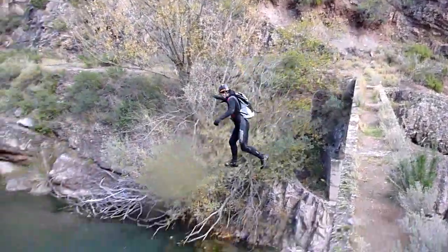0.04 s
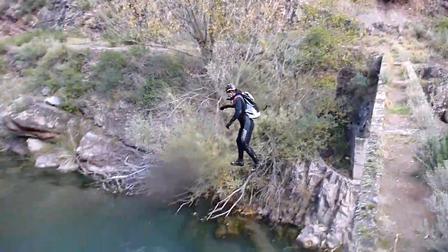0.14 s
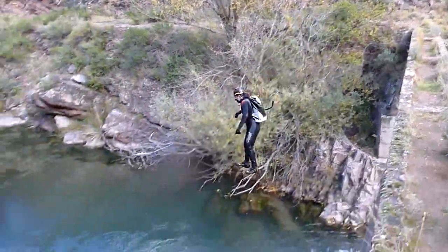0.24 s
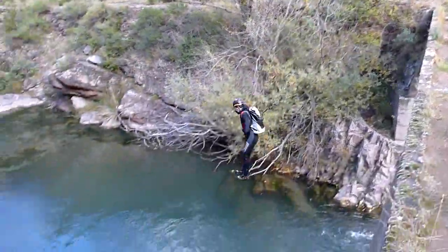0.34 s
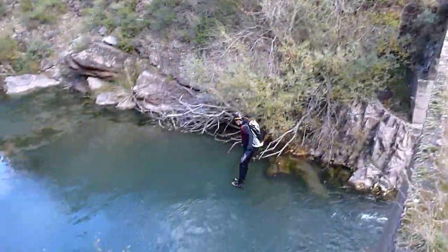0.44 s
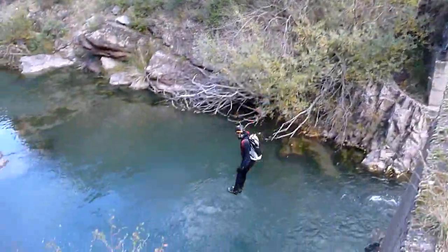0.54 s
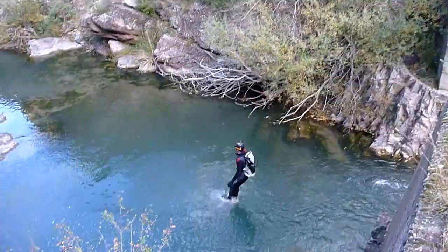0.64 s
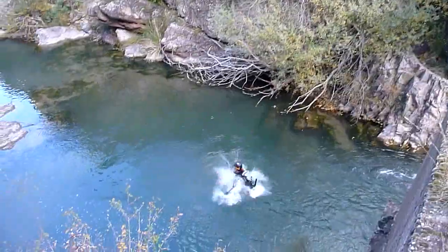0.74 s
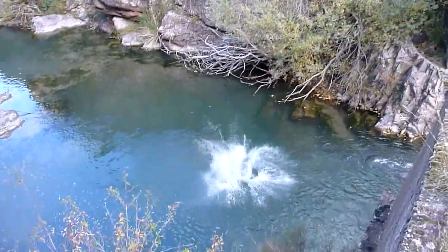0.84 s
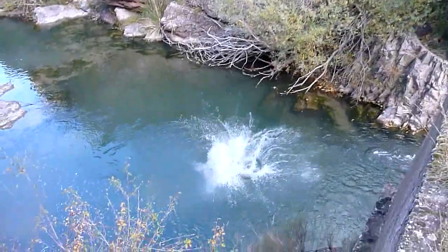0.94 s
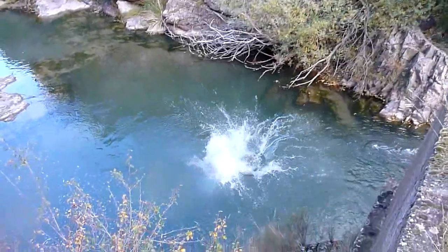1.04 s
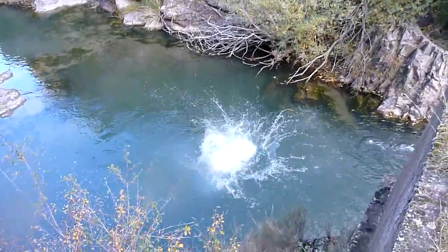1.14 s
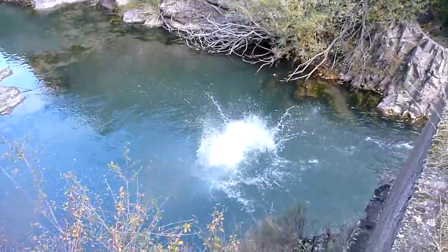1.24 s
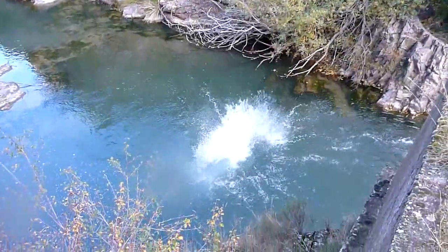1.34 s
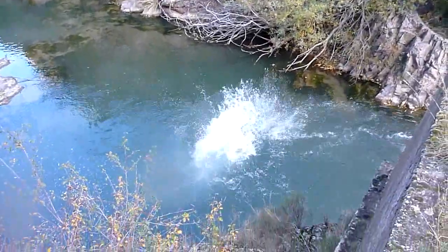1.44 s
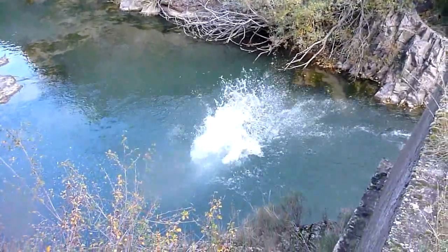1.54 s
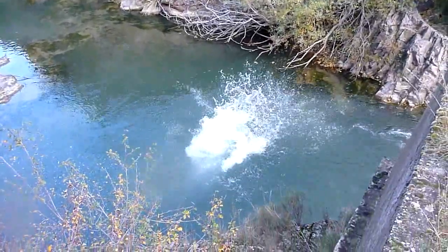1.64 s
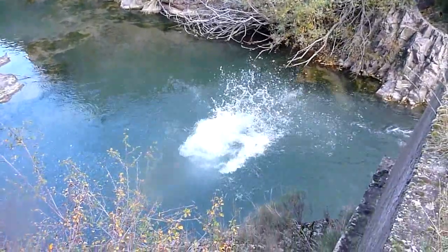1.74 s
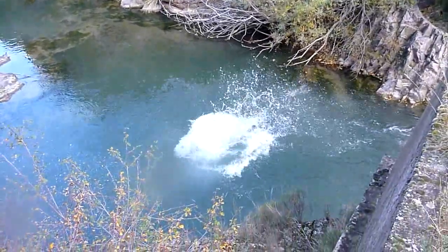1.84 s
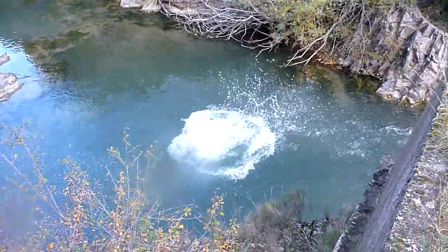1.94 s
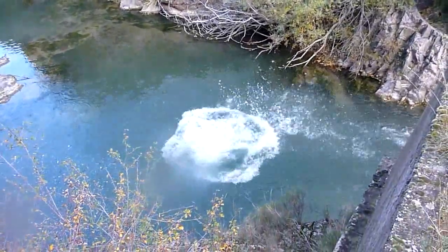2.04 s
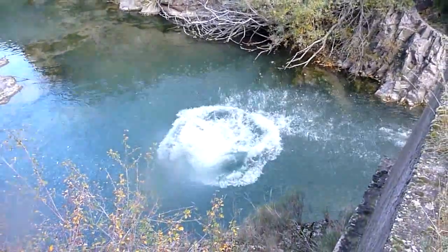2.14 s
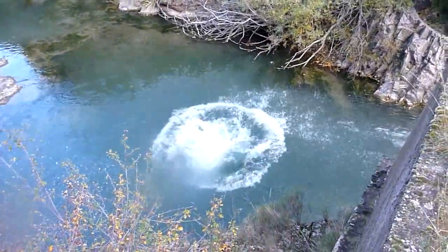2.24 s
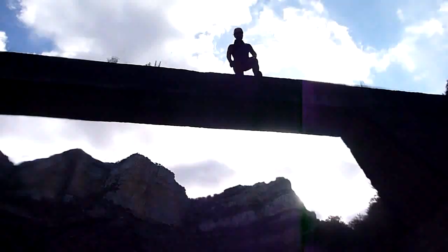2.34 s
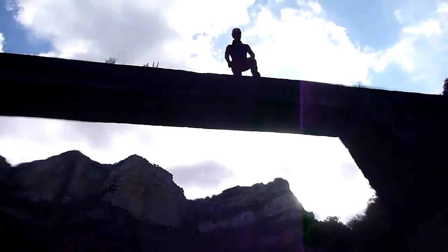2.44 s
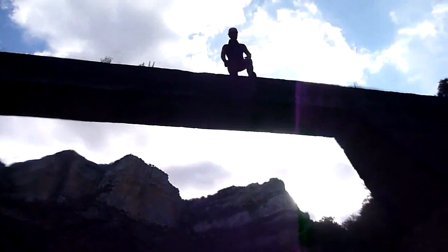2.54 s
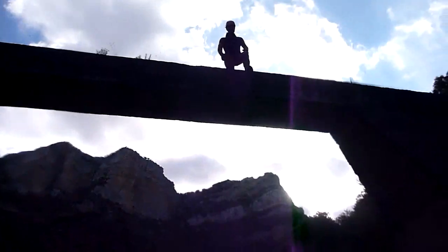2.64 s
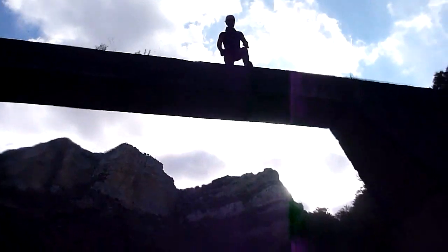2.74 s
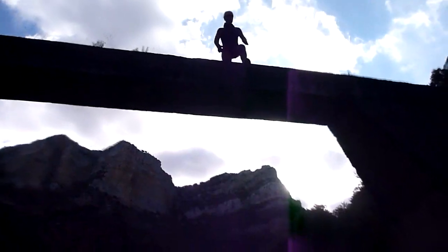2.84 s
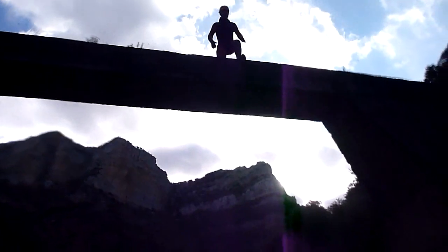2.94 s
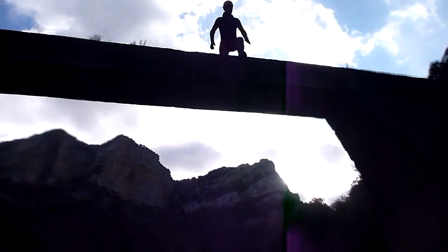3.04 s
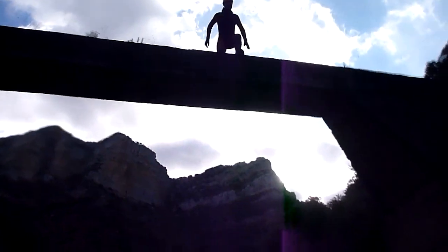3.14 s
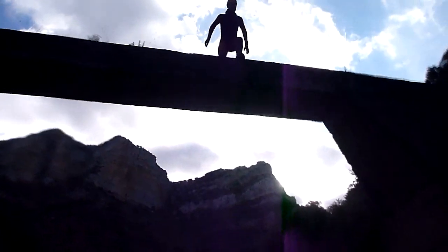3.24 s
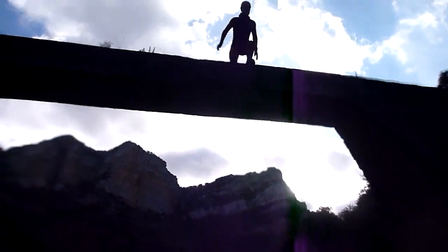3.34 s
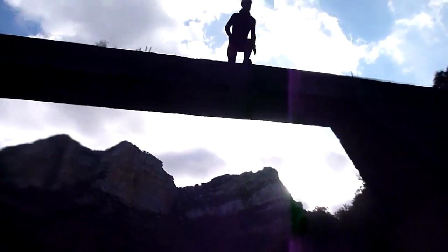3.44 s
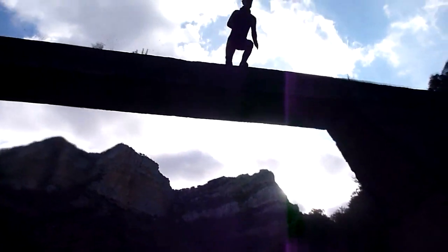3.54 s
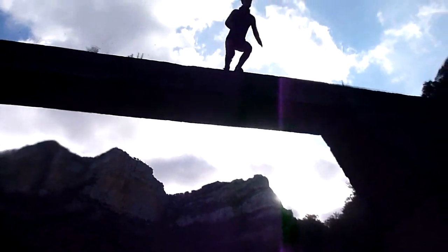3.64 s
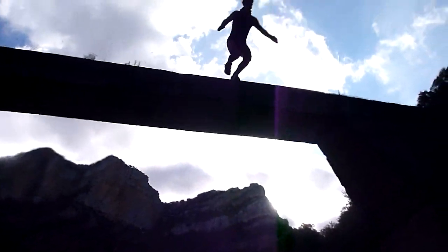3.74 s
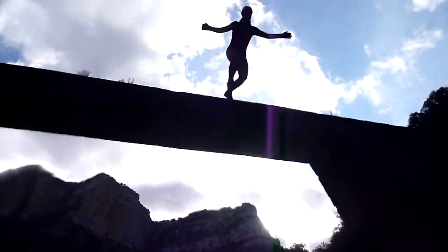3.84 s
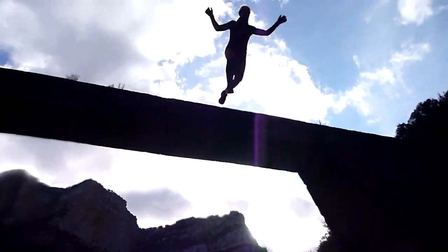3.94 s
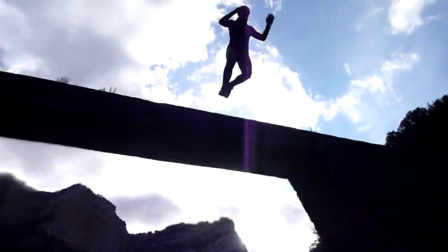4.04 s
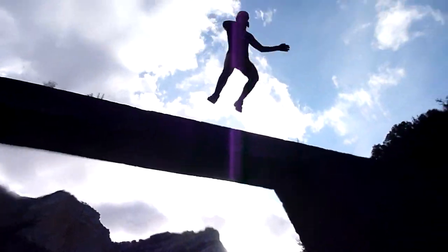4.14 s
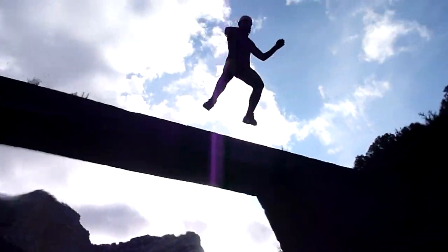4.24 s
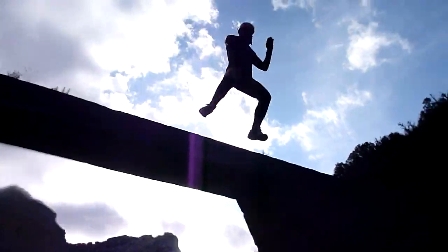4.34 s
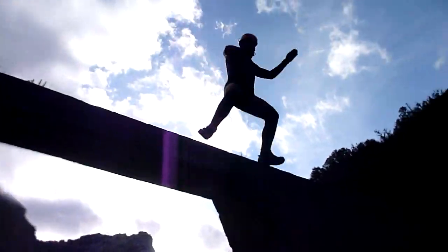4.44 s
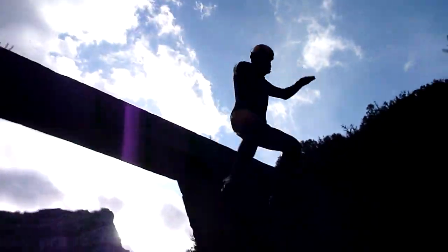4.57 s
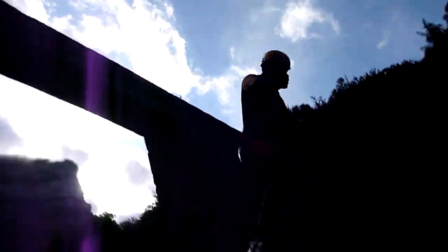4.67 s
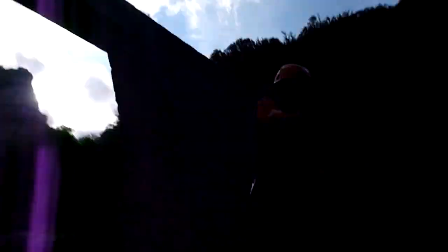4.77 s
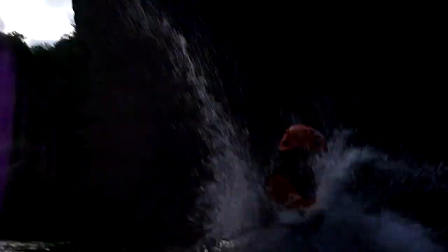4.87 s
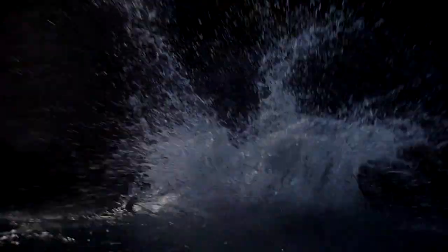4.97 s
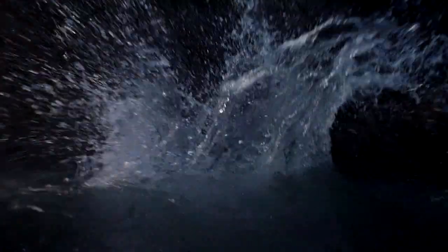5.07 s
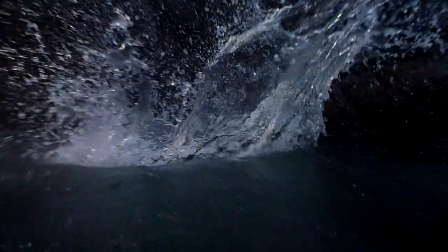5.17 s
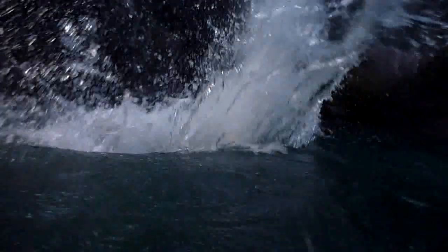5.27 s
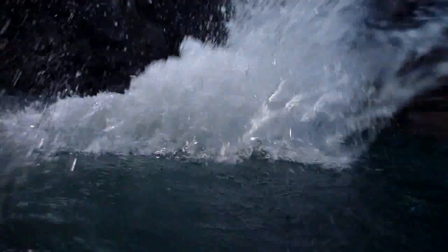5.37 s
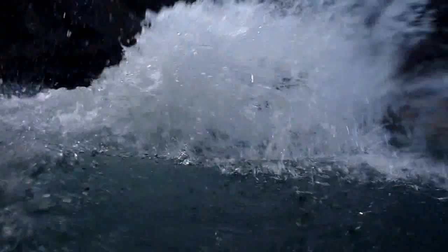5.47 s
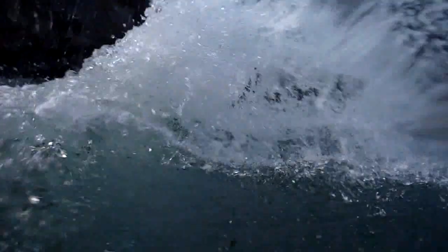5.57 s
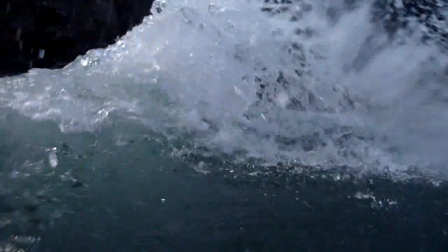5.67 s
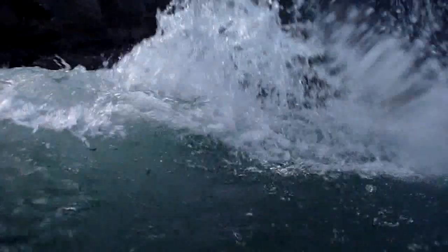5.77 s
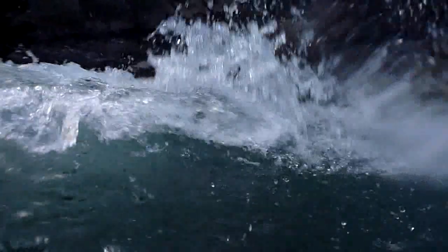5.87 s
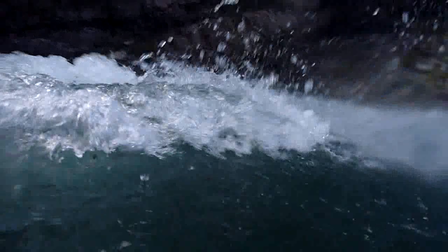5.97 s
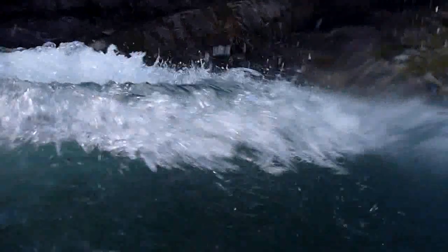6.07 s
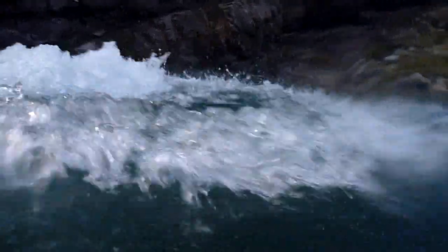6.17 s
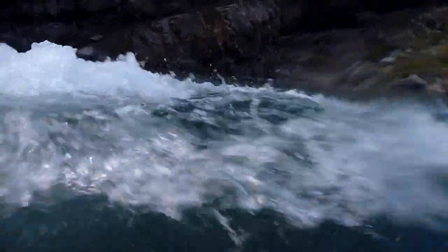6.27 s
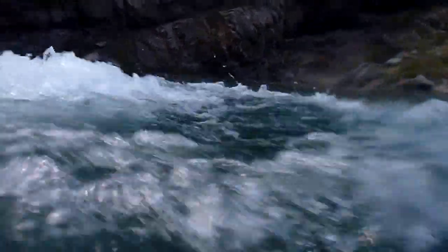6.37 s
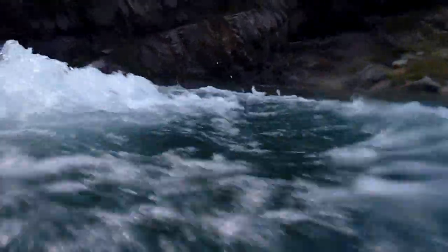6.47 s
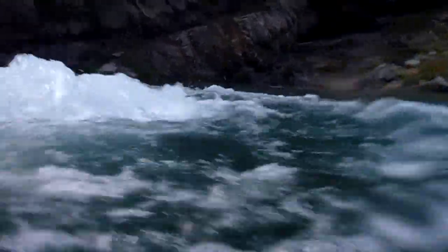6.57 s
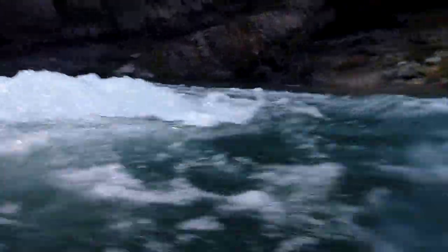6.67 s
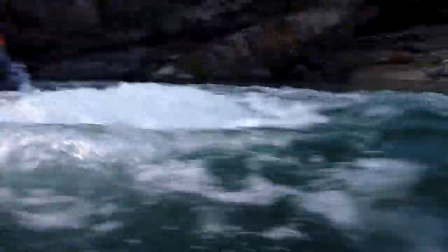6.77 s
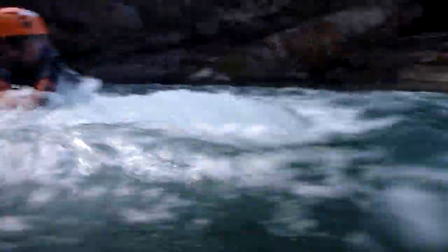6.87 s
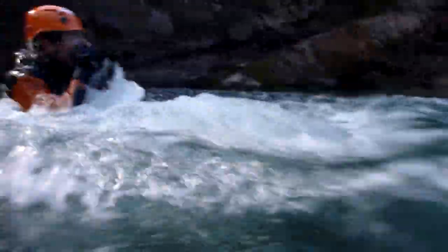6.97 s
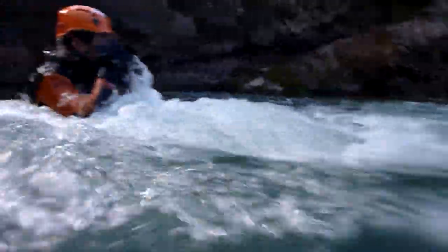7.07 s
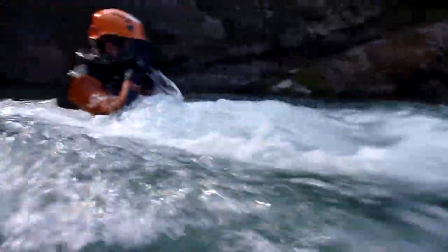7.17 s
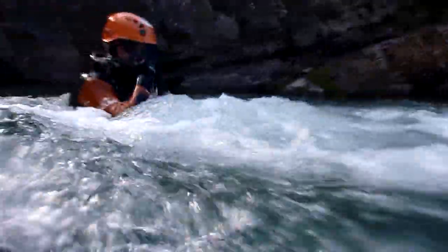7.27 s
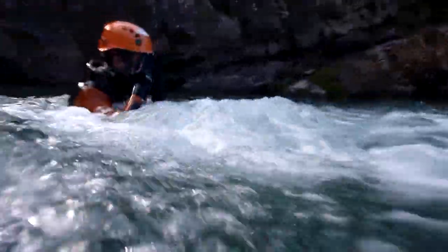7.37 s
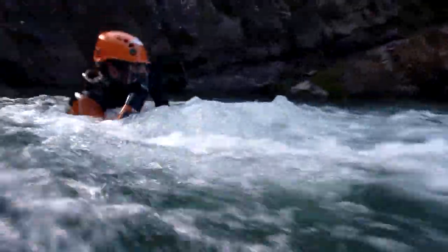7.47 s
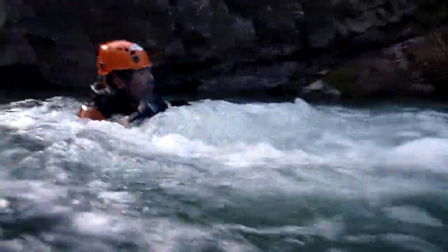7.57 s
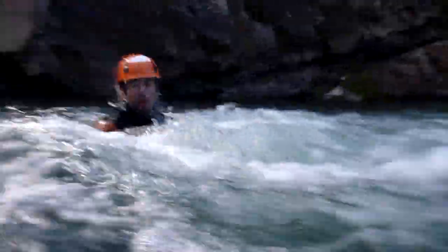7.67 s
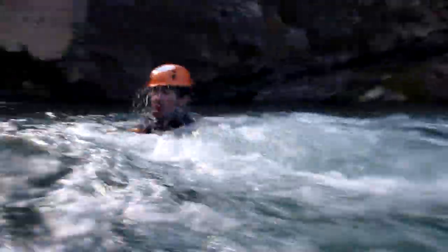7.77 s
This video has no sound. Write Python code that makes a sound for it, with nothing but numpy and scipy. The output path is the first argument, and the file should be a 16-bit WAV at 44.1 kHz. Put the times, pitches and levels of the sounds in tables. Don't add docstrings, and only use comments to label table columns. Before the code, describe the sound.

Outdoors in a river gorge, quiet muffled water is broken by a distant flat smack and a pattering splash. A momentary gap, then a cut to water level: fuller, livelier rushing water and a few hard knocks on the casing. A violent near plunge clips the small microphone, its air pocket throbs shut, the foam surges and boils, then fades into swirling water, plinks and ticks.

```python
import sys
import numpy as np
from scipy import signal
from scipy.fft import rfft, irfft
from scipy.io import wavfile
from scipy.ndimage import uniform_filter1d

SR = 44100
rng = np.random.default_rng(int(sys.argv[2]) if len(sys.argv) > 2 else 0)


def volts_from_db(level):
    exponent = np.asarray(level, float) / 20
    return 10 ** exponent


def log_audio(samples):
    frames = np.atleast_2d(samples).T
    limited = np.clip(frames, -1, 1)
    pcm = np.round(limited * 32767).astype(np.int16)
    wavfile.write(sys.argv[1], SR, pcm)


N = 344458

SPLASH_S, VIEW_CHANGE_S, PLUNGE_S = 0.77, 2.3935, 4.862
DROPOUT_START_S, DROPOUT_END_S = 2.2043, 2.2960
BELOW_DB_PER_OCTAVE, ABOVE_DB_PER_OCTAVE = 4.5, 5.5

# low_hz, high_hz
LAYER_BANDS = [(30, 250), (250, 1500), (1500, 3600), (3600, 9500)]
# rumble_db, body_db, rush_db, spray_db
RIVER_LEVELS = [
    (-46, -36.5, -40, -48),
    (-44, -30, -32.5, -41),
]
# frequency_hz, level_db
FAR_RIVER_COLOUR = [(40, -15), (90, 19.5), (300, 19), (700, 4), (1900, -18), (2500, -20), (3300, -19.5),
                    (4100, -23), (4900, -30.5), (5700, -25.5), (6800, -34), (7400, -31.5), (8500, -41)]
# frequency_hz, level_db
FALLING_SPRAY_COLOUR = [(90, -2.5), (350, -0.5), (560, -9), (1500, -6), (1850, -7), (2300, -2), (3400, -5),
                        (4050, -14), (4800, -12), (5400, -16.5), (6700, -22.5), (7450, -15), (8500, -23),
                        (9300, -29.5)]
# frequency_hz, level_db
POOL_COLOUR = [(40, -33), (150, -2), (350, 8), (600, 9), (1000, -1), (1500, -1), (1900, -6), (2600, -8),
               (3100, -15), (3700, -8), (4300, -12.5), (5500, -12.5), (6900, -6), (8500, -15.5)]
# frequency_hz, level_db
FOAM_COLOUR = [(40, -11), (150, -1.5), (350, -2.5), (700, -11), (1050, -3.5), (1600, -2), (2200, 5),
               (2700, 1.5), (3300, -4.5), (4300, -18.5), (5000, -14), (6050, -24), (6900, -13.5),
               (8500, -25.5)]
# time_s, share_of_direct, delay_ms
WATER_ECHO = [(2.39, 0, .53), (2.4, .3, .53), (3.0, .35, .52), (3.8, .35, .5), (4.4, .35, .475),
              (4.85, .35, .48), (4.87, 0, .48)]
# time_s, restlessness (factor on the flicker in dB)
RESTLESSNESS = [(.75, .3), (.8, 1.1), (2.5, .8), (2.6, .4), (4.7, .4), (4.9, 1.2), (5.4, .8), (6.3, .9),
                (7.0, 1.2)]
# time_s, strength_db
RAIN_STRENGTH = [(.77, -42), (.83, -26.5), (.9, -29), (1.07, -36.5), (1.18, -30), (1.35, -30), (1.8, -29.5),
                 (2.15, -25.5), (2.39, -29.5)]
# time_s, strength_db
BOIL_STRENGTH = [(5.2, -35.5), (5.36, -24.5), (5.55, -22.5), (5.97, -23), (6.33, -26.5), (6.63, -32),
                 (6.75, -32), (7.5, -34), (7.81, -45.5)]
# level_db at strength -30 dB, slope_db_per_db
RAIN_LAYER_LAW = [
    (-53.5, 0.5),
    (-34.5, 0.8),
    (-29.5, 1.1),
    (-38, 1.35),
]
# level_db at strength -30 dB, slope_db_per_db
BOIL_LAYER_LAW = [
    (-69, .6),
    (-31.5, 0.96),
    (-30.5, 1.14),
    (-39, 1.72),
]
# peak_s, level_db, centre_hz, rise_s, fall_s (both per 20 dB)
WATER_SURGES = [(.83, -23.5, 350, .09, .5), (1.07, -24, 250, 0.32, 0.37), (1.18, -27, 700, 0.066, -0.4),
                (2.46, -30, 800, .2, 0.4), (4.81, -38, 5000, .15, 0.6), (4.925, -33, 4500, 0.12, 0.3),
                (4.93, -19.5, 394, .09, 0.13), (4.97, -33.5, 60, .1, -1.5),
                (4.965, -19.5, 3500, 0.02, -0.77), (5.11, -17.5, 298, 0.11, 0.06),
                (5.04, -26.5, 400, 0.09, 1), (5.27, -16.5, 398, 0.15, 0.22), (5.4, -37, 90, 0.36, -1.1),
                (5.9, -39, 110, .7, -5.5), (6.05, -23.5, 700, 0.57, 1.1), (6.3, -37.5, 130, 0.81, 0),
                (6.55, -25, 300, .2, -2), (6.9, -28, 350, 0.13, -1.2), (7.07, -34.5, 3000, 0.17, 0.3),
                (7.2, -42.5, 110, 0.29, -3)]
# start_s, depth_db, recovery_s
RIVER_DUCKS = [
    (2.548, 3, 0.65),
    (4.468, 5, 0.23),
    (4.868, 6.5, 0.019),
    (5.1, 14, 0.42),
]
# start_s, crack_db, push_db, hold_s, t60_s
BODY_SLAPS = [
    (0.7689, -6, -7.5, 0.0014, 0.027),
    (4.862, -1, 3, 0.0029, 0.0063),
]
# crack_hz, crack_width_hz, push_hz, sag_per_s, push_t60_s
SLAP_TONES = [
    (1500, 1770, 360, 50, 0.025),
    (3280, 6200, 830, 115, 0.01),
]
# start_s, peak_db, pitch_hz, width_share of pitch, t60_s
HOUSING_DROPS = [(.843, -15, 295, 0.83, .03), (0.8739, -4.5, 1500, 1, 0.014), (1.364, -14, 2360, .41, .012),
                 (2.5408, 4, 4090, 0.7, 0.014), (4.463, 3, 1610, 0.32, 0.0057),
                 (4.963, -16, 6800, .22, .017), (5.073, -14.5, 5100, 0.18, .009),
                 (5.233, -2, 4600, 0.4, 0.0046), (5.233, -8, 2310, .4, .004),
                 (5.289, -12.5, 5000, .4, .005), (5.328, -10, 5800, 0.23, 0.0057),
                 (5.3324, -0.5, 2250, 0.15, 0.0063), (5.365, -14, 5560, .34, .005),
                 (5.39, -8.5, 4900, .4, .005), (6.4015, -1, 3800, 0.91, .003), (6.573, 1, 1500, 1.5, .004),
                 (6.79, -23, 4870, .2, .008), (6.845, -21, 5660, .2, .01), (6.9242, -5, 4000, 0.22, 0.012),
                 (7.3017, -16, 7300, .5, .008), (7.398, -18, 5040, .23, .008),
                 (7.592, -9, 3380, 0.65, 0.0055), (7.6235, -18, 3200, 0.18, .012),
                 (7.646, -25, 3500, 0.25, .012)]
# start_s, peak_db, pitch_hz, t60_s
LARGE_BUBBLES = [(1.179, -16.5, 2130, 0.03), (2.441, -26, 800, 0.03), (2.473, -13.5, 835, 0.027),
                 (6.133, -20, 2080, 0.03), (6.33, -12.5, 1280, 0.026), (6.688, -9.5, 2260, 0.012),
                 (6.94, -11, 2600, 0.019), (7.074, -19, 2080, 0.036), (7.092, -27, 1200, 0.023),
                 (7.255, -17, 2160, 0.024), (7.398, -14, 1030, 0.03), (7.455, -16, 2070, 0.023),
                 (7.549, -13, 1113, 0.035), (7.614, -16, 1890, 0.041), (7.657, -1, 990, 0.0051)]
# middle_s, level_db, centre_hz, width_hz, length_s
GUSTS = [
    (4.805, -34, 5700, 1600, .1),
    (4.92, -34, 5000, 1200, .05),
    (5.58, -32, 3970, 800, .08),
    (5.14, -24.5, 230, 300, .13),
    (5.2, -24, 210, 250, .07),
    (6.92, -36.5, 55, 50, .25),
    (6.58, -36.5, 60, 60, .08),
    (4.47, -43, 40, 40, .1),
]
# time_s, level_db, pulse_hz
CAVITY_PULSING = [(5.07, -44, 93), (5.095, -16, 91.7), (5.125, -17, 90.8), (5.155, -13.5, 95.4),
                  (5.172, -42.5, 92.7), (5.19, -12.5, 87), (5.211, -14.5, 84), (5.24, -26, 99.4),
                  (5.31, -27, 100)]
# centre_hz, width_hz
PORT_NOTCHES = [(2893, 200), (7880, 300), (8080, 520)]
# frequency_hz, level_db
FREQUENCY_RANGE = [(20, -21.5), (50, -7), (90, -1.5), (8600, -1.5), (9300, -11.5), (9700, -24.5),
                   (10000, -37), (10500, -88.5)]


def evened(x):
    return x / np.sqrt(np.mean(x ** 2) + 1e-20)


def read(points, hz):
    f, value = np.transpose(points)
    return np.interp(np.log(hz + 1), np.log(f + 1), value)


def add(mix, start_s, sound):
    part = mix[round(start_s * SR):][:len(sound)]
    part += sound[:len(part)]


def ring(x, hz, width_hz):
    ratio = 1 + width_hz / (2 * hz)
    band = [hz / ratio, min(hz * ratio, SR / 2.2)]
    return signal.lfilter(*signal.butter(1, band, "band", fs=SR), x)


def bubbles(per_s, lo_hz, hi_hz, cycles, spread_db, sizes=24):
    out = np.zeros(N)
    for hz in np.geomspace(lo_hz, hi_hz, sizes):
        turns = np.arange(0, 3 * cycles, hz / SR)
        envelope = np.exp(-2 * turns / cycles) * np.minimum(turns, 1)
        chirp = np.sin(2 * np.pi * turns * (1 + 0.0239 * turns)) * envelope
        count = int(np.clip(per_s * N / SR / sizes, 1, 400))
        place, rarity = rng.random((400, 2))[:count].T
        train = np.zeros(N)
        train[(place * N).astype(int)] = volts_from_db(-spread_db * np.log(rarity + 0.013))
        out += signal.oaconvolve(train, chirp / np.linalg.norm(chirp))[:N]
    return evened(out)


def layers_db(t, centres_hz):
    near = t > VIEW_CHANGE_S
    duck_db = 0
    for s, depth_db, recovery_s in RIVER_DUCKS:
        duck_db = duck_db + depth_db * (t > s) * np.exp(-np.maximum(t - s, 0) / max(recovery_s, 0.005))
    power = volts_from_db(np.transpose(RIVER_LEVELS)[:, near.astype(int)] - duck_db) ** 2

    for curve, law in ((RAIN_STRENGTH, RAIN_LAYER_LAW), (BOIL_STRENGTH, BOIL_LAYER_LAW)):
        s, strength_db = np.transpose(curve)
        base_db, slope = np.transpose(law)[:, :, None]
        sounding = (t > s[0]) & (near == (s[0] > VIEW_CHANGE_S))
        power = power + sounding * volts_from_db(base_db + slope * (np.interp(t, s, strength_db) + 30)) ** 2

    for s, db, hz, rise_s, fall_s in WATER_SURGES:
        octaves = np.log2(centres_hz / hz)[:, None]
        tilt_db = np.minimum(BELOW_DB_PER_OCTAVE * octaves, -ABOVE_DB_PER_OCTAVE * octaves)
        shape_db = 20 * np.minimum((t - s) / max(rise_s, 0.01), (s - t) / max(fall_s, 0.01))
        same_view = near == (s > VIEW_CHANGE_S)
        power = power + same_view * volts_from_db(db + tilt_db + shape_db) ** 2
    return 10 * np.log10(power)


def water():
    bubble_share = 0.15
    hiss = np.sqrt(1 - bubble_share) * rng.standard_normal(N)
    drive = hiss + np.sqrt(bubble_share) * bubbles(1200, 688, 8890, cycles=9.9, spread_db=0.64)
    hz, t, spectra = signal.stft(drive, SR, nperseg=512, noverlap=384)

    stage = (t > SPLASH_S).astype(int) + (t > VIEW_CHANGE_S) + (t > PLUNGE_S)
    stage_colours = (FAR_RIVER_COLOUR, FALLING_SPRAY_COLOUR, POOL_COLOUR, FOAM_COLOUR)
    colour = volts_from_db([read(points, hz) for points in stage_colours])[stage].T

    s, share, delay_ms = np.transpose(WATER_ECHO)
    delay_s = np.interp(t, s, delay_ms) / 1000
    echo = np.interp(t, s, share) * (hz[:, None] < 7000) * np.exp(-2j * np.pi * hz[:, None] * delay_s)
    colour = colour * abs(1 - echo)

    centres = np.log([np.sqrt(lo * hi) for lo, hi in LAYER_BANDS])
    wanted_db = layers_db(t, np.exp(centres))
    blend = np.array([np.interp(np.log(hz + 1), centres, row) for row in np.eye(len(LAYER_BANDS))])
    inside = np.array([(hz > lo) & (hz <= hi) for lo, hi in LAYER_BANDS]) / len(hz)
    for _ in LAYER_BANDS:
        level_db = 10 * np.log10(inside @ colour ** 2)
        colour = colour * volts_from_db(blend.T @ (wanted_db - level_db))

    patches = uniform_filter1d(rng.standard_normal(spectra.shape), 8, 0)
    patches = evened(uniform_filter1d(patches, 12, 1))
    gusts = evened(uniform_filter1d(rng.standard_normal(len(t)), 3))
    restless = np.interp(t, *np.transpose(RESTLESSNESS))
    colour = colour * volts_from_db(restless * (0.8 * patches + 0.9 * gusts))
    return signal.istft(spectra * colour, SR, nperseg=512, noverlap=384)[1][:N]


def slaps():
    out, t = np.zeros(N), np.arange(3000) / SR
    for slap, tone in zip(BODY_SLAPS, SLAP_TONES):
        s, crack_db, push_db, hold_s, crack_t60 = slap
        crack_hz, width_hz, push_hz, sag, push_t60 = tone
        crack = ring(rng.standard_normal(len(t)), crack_hz, width_hz)
        crack = evened(ring(crack, crack_hz, 2 * width_hz))
        sagging = -np.sin(2 * np.pi * push_hz * t / (1 + sag * t))
        heave = 0.34 * np.minimum(t / hold_s, 1)
        hollow = 1.35 * np.sin(2 * np.pi * 930 * t) * volts_from_db(-4000 * t)
        push = sagging + heave + hollow
        onset = np.minimum(t / 0.0003, 1)
        after_hold_s = np.maximum(t - hold_s, 0)
        crack_fade = onset * volts_from_db(-60 * after_hold_s / crack_t60)
        push_fade = onset * volts_from_db(-60 * after_hold_s / push_t60)
        add(out, s, crack_fade * volts_from_db(crack_db) * crack + push_fade * volts_from_db(push_db) * push)
    return out


def drops():
    out, t = np.zeros(N), np.arange(1500) / SR
    rattles = rng.standard_normal((len(HOUSING_DROPS), len(t)))
    for (s, db, hz, width_share, t60), rattle in zip(HOUSING_DROPS, rattles):
        blow = 6 * (t == 0) + rattle * volts_from_db(-60 * t / max(t60, 0.001))
        own = evened(ring(ring(blow, hz, max(width_share, 0.02) * hz), hz, 2 * hz))
        plain = evened(ring(ring(blow, 2800, 4000), 3400, 7000))
        plain_share = 0.5 * volts_from_db(0.55 * db)
        tick = own - plain_share * plain
        add(out, s, volts_from_db(db) * tick / abs(tick).max())
    return out


def blips():
    out, t = np.zeros(N), np.arange(2500) / SR
    for s, db, hz, t60 in LARGE_BUBBLES:
        tone = np.sin(2 * np.pi * hz * t * (1 + 6 * t))
        onset = np.minimum(t / 0.00049, 1)
        add(out, s, volts_from_db(db - 60 * t / max(t60, 0.002)) * onset * tone)
    return out


def puffs():
    out = np.zeros(N)
    noises = rng.standard_normal((len(GUSTS), SR // 2))
    for (s, db, hz, width_hz, length_s), noise in zip(GUSTS, noises):
        gust = evened(ring(ring(noise, hz, width_hz), hz, width_hz))
        gust = gust[-int(np.clip(length_s, 0.01, 0.4) * SR):]
        add(out, s - len(gust) / SR / 2, volts_from_db(db) * gust * np.hanning(len(gust)))
    return out


def cavity():
    s, db, hz = np.transpose(CAVITY_PULSING)
    t = np.arange(s[0], s[-1], 1 / SR)
    wobble = evened(uniform_filter1d(rng.standard_normal(len(t)), 500))
    turns = np.cumsum(np.interp(t, s, hz) * (1 + 0.06 * wobble)) / SR
    pulses = np.zeros(len(t))
    for k, partial_db in enumerate([4.0, 0.0, -4.0, -7.5, -17]):
        pulses += volts_from_db(partial_db) * np.cos(2 * np.pi * (k + 1) * turns + k)
    envelope = volts_from_db(np.interp(t, s, db) - 4.5) * signal.windows.tukey(len(t), 0.2)
    out = np.zeros(N)
    add(out, s[0], envelope * evened(pulses))
    return out


def scene():
    return (water() + slaps() + drops() + blips() + cavity() + puffs())[None]


def top_cut(x):
    return signal.sosfilt(signal.butter(12, 16500, fs=SR, output="sos"), x)


def record(dry):
    x, hz, t = dry, np.fft.rfftfreq(N, 1 / SR), np.arange(N) / SR
    for notch_hz, width_hz in PORT_NOTCHES:
        x = signal.lfilter(*signal.iirnotch(notch_hz, notch_hz / width_hz, SR), x)
    x = irfft(rfft(x) * volts_from_db(read(FREQUENCY_RANGE, hz)), N)

    power_db = 10 * np.log10(signal.lfilter(np.ones(90) / 90, 1, x[0] ** 2) + 1e-12)
    fall_db = 600 * t
    over_db = np.maximum(np.maximum.accumulate(power_db + fall_db) - fall_db + 8, 0)
    late_db = np.concatenate([np.zeros(190), over_db[:-190]])
    x = x / volts_from_db(0.7 * uniform_filter1d(late_db, 60))
    x = x / (1 + (abs(x) / 0.88) ** 8) ** (1 / 8)

    x = x * np.where(t < VIEW_CHANGE_S, 1, -1)
    treble = [(9500, 0), (10500, -9), (16000, -12), (16600, -60)]  # frequency_hz, level_db
    x = irfft(rfft(x) * volts_from_db(read(treble, hz)), N)
    outside_s = np.maximum(DROPOUT_START_S - t, t - DROPOUT_END_S)
    x = x * np.clip(outside_s / 0.0006, 0, 1)
    return top_cut(x)


dry = scene()
out = record(dry)
log_audio(out)
```